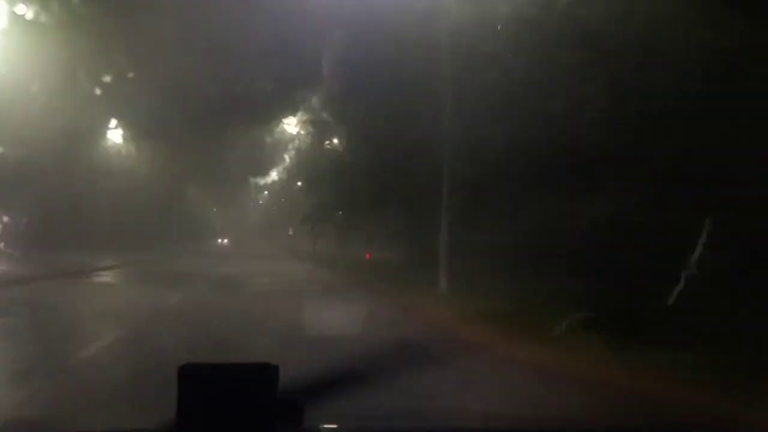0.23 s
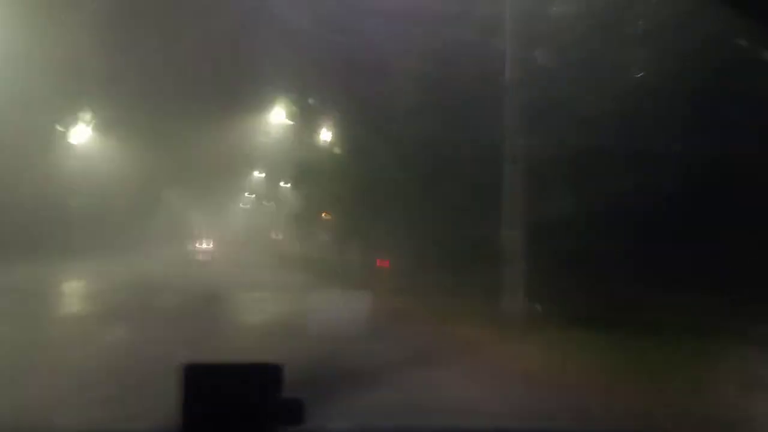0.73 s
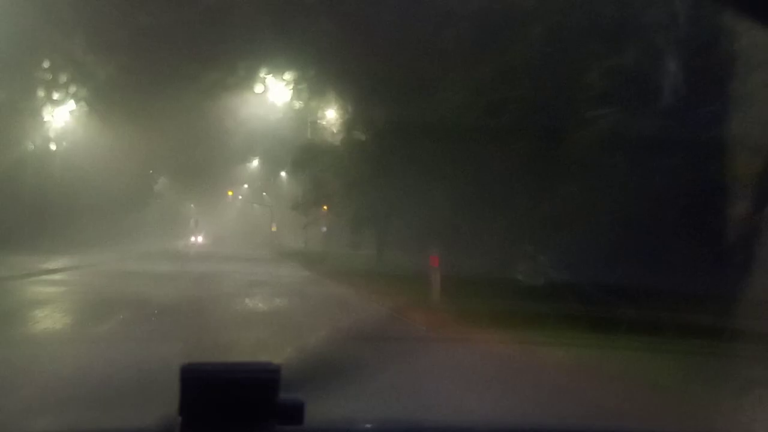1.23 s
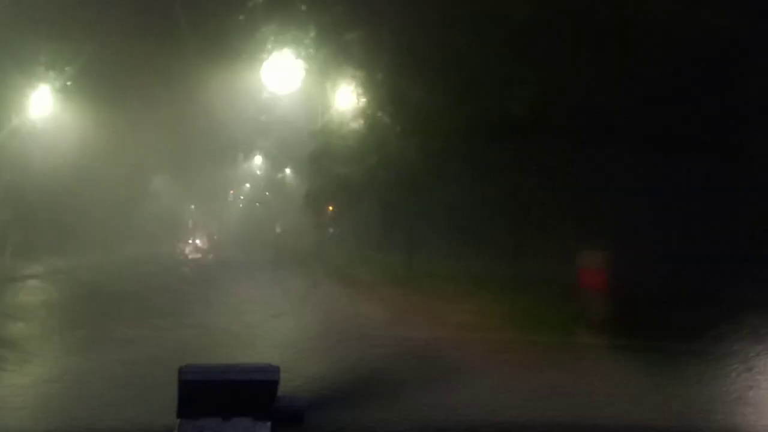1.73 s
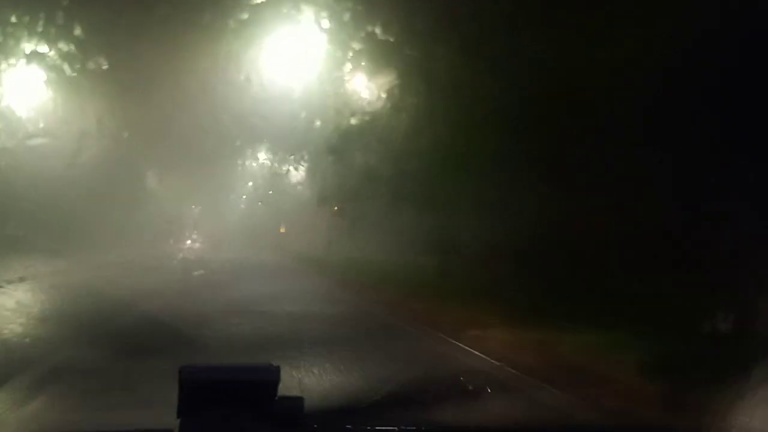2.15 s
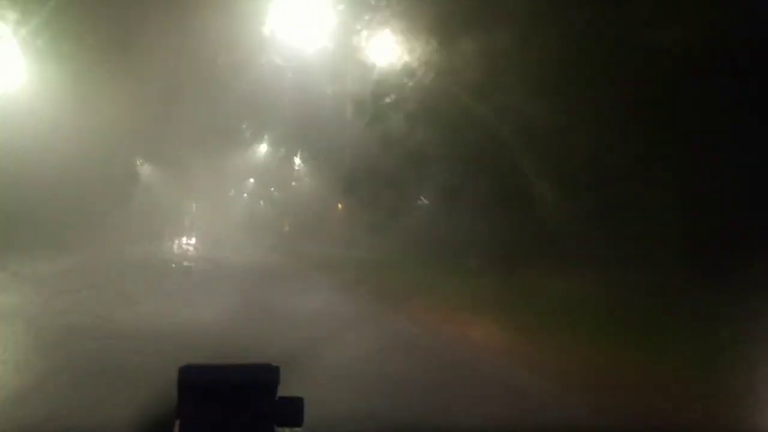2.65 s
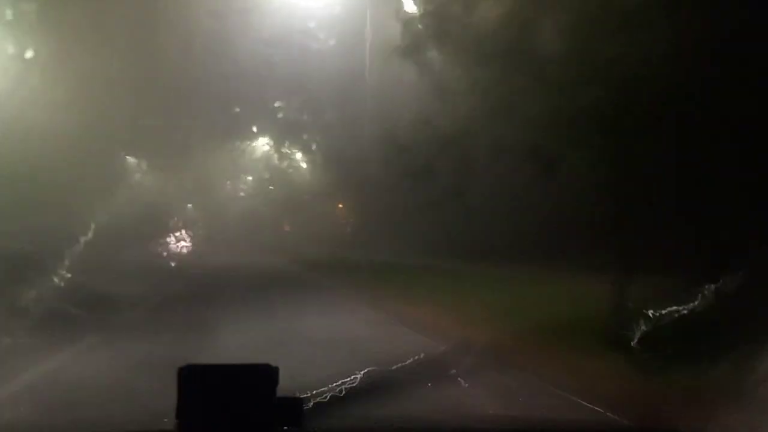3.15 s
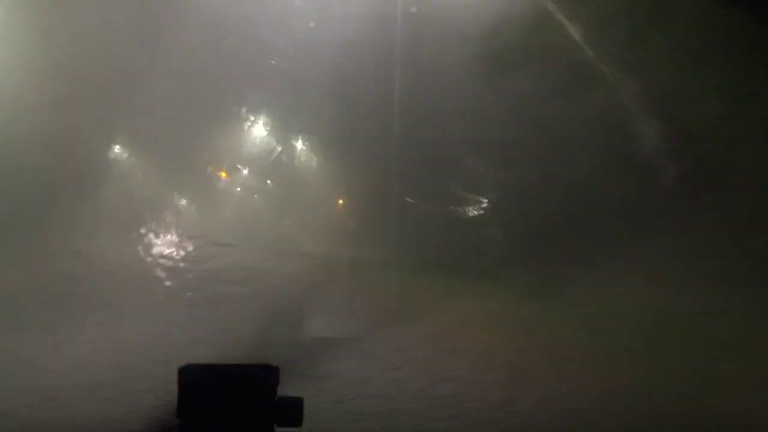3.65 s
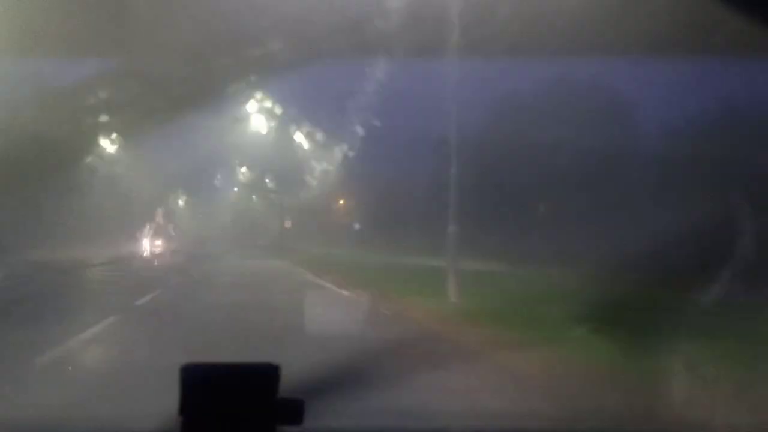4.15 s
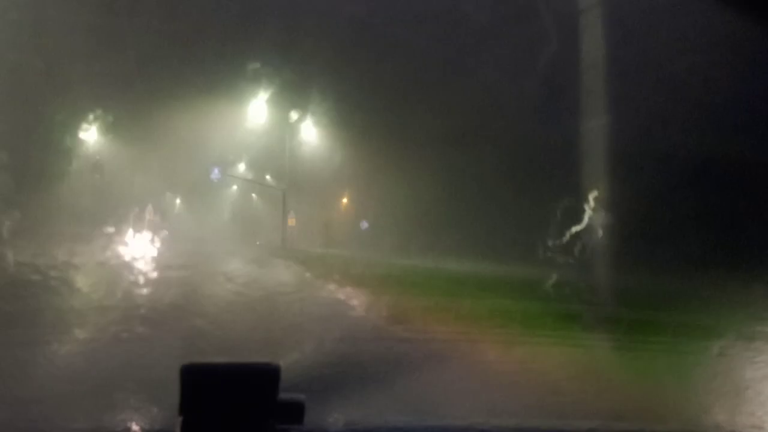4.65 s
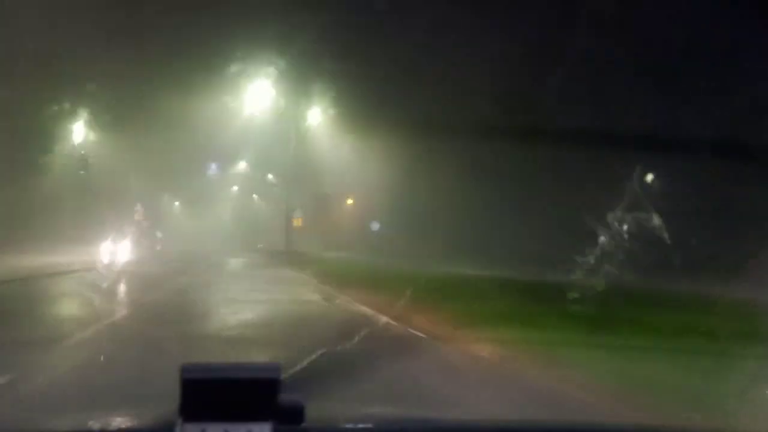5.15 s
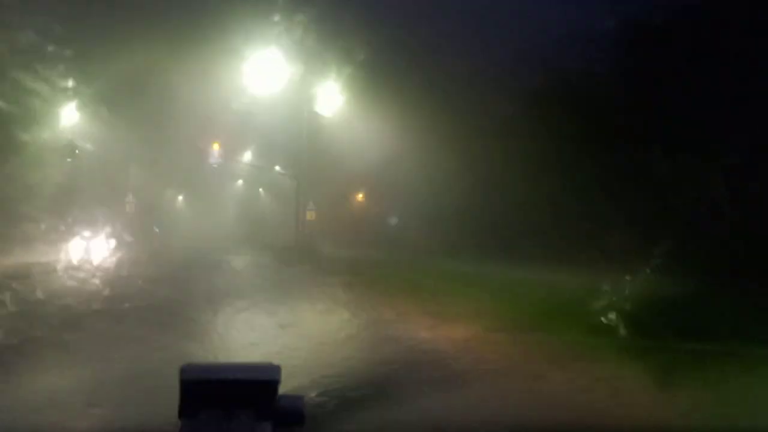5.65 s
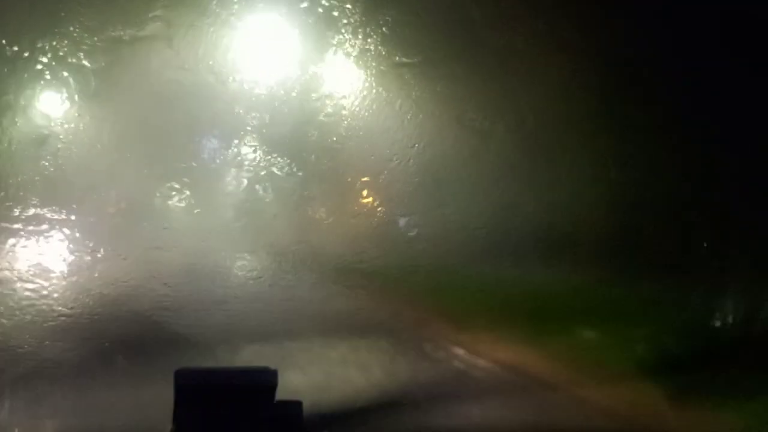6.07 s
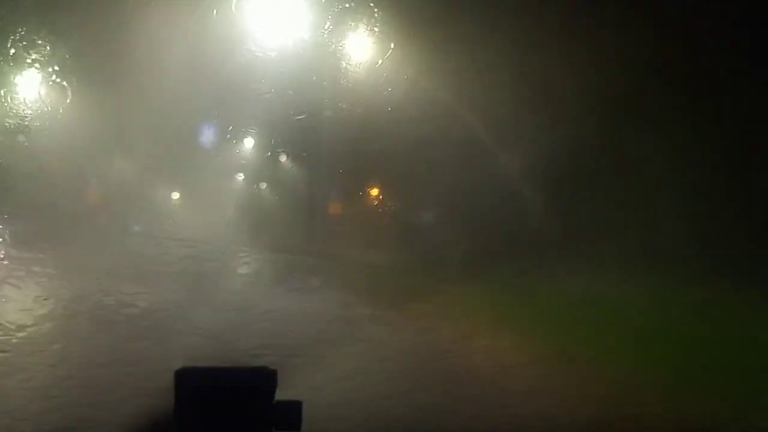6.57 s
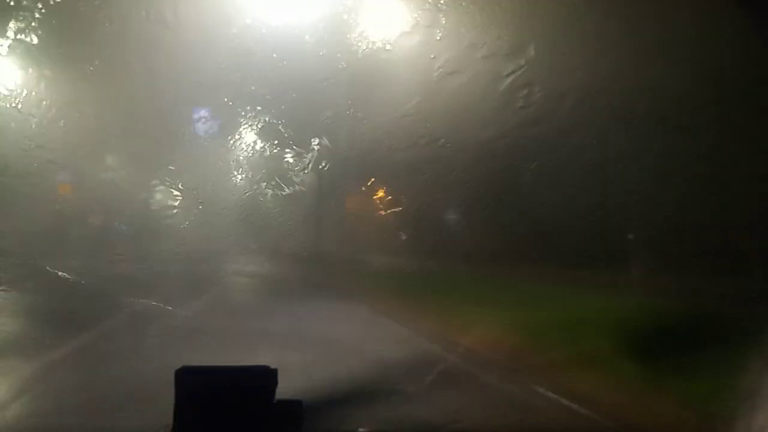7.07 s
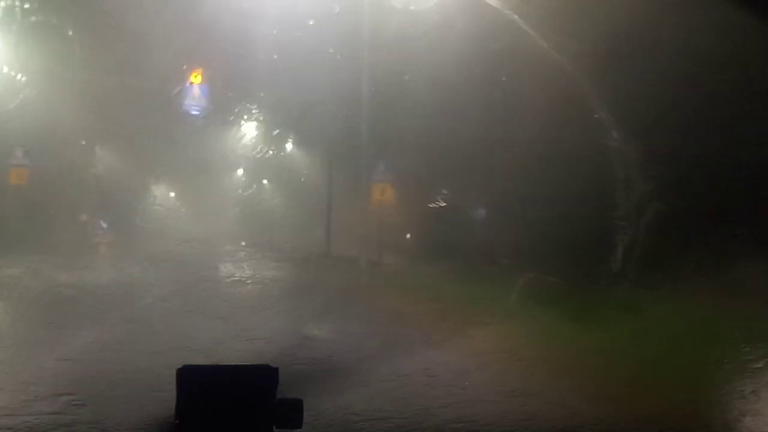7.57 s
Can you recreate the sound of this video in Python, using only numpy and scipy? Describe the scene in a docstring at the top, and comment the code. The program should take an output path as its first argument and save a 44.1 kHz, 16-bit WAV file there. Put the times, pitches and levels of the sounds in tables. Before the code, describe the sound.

Heard from one microphone inside a car in heavy rain at night. Low cabin boom and tyre rumble continue throughout, far back, under fine pattering rain and faint ticks. From 0.5 to 0.95 s a cluster of deep bumps thuds, with a tiny rising creak at 0.65; spray swells at 0.9-1.1. Moderate water drums on panels around 1.7-1.8 with dull knocks, then it thins near 2 s, with little splats until 2.6. Hissing sheets build from 2.7 to a burst at 2.9, with a hard drop tick at 2.95. After a brief dip, the loudest washes overlap from 3.35 to 4.1, another clear tick at 3.87, fading by 4.3. A small splash comes at 4.55, then quiet patter and soft low thuds at 5.1-5.3. Splashes return at 5.5-5.9, a strong sudden swash hits at 6.36, then weaker spray trails off over road rumble to 7.8.

```python
"""Inside a car driving slowly through heavy rain at night, as a single microphone hears it.
Far off in the mix, shaped noise makes road boom and rumble; decaying sines make the dull thuds of bumps
and of the wipers turning, and a short creak of the body. Close by, random droplets patter and big drops tick.
Sheets of water from puddles and wiper strokes lead: shaped droplets hiss on the glass, drum on ringing panels
and wash in the wheel wells, while narrow noise bands make jets of water ring."""
import sys
import numpy as np
from scipy import signal
from scipy.io import wavfile
from scipy.ndimage import uniform_filter1d

SR = 44100
rng = np.random.default_rng(int(sys.argv[2]) if len(sys.argv) > 2 else 0)


def ratio_of_db(decibels):
    """Turn decibels (scalar or array-like) into linear amplitude factors; 0 dB maps to 1."""
    return 10 ** (np.asarray(decibels, float) / 20)


def generate_wav(sig):
    """Save sig (samples, or channels by samples) to the path in sys.argv[1] as 16-bit PCM at SR."""
    pcm = np.round(np.clip(np.atleast_2d(sig).T, -1, 1) * 32767).astype(np.int16)
    wavfile.write(sys.argv[1], SR, pcm)


N = 343980  # samples
SWELL_STEP = 64  # samples between the points of a swell


def evened(x):
    """Scaled to rms 1."""
    return x / np.sqrt(np.mean(x ** 2) + 1e-20)


def read(points, hz):
    """Spectrum in dB at each frequency, interpolated over log frequency."""
    f, value = np.transpose(points)
    return np.interp(np.log(hz + 1), np.log(f + 1), value, left=-100, right=-100)


def curves(rows):
    """Each column after the first as a curve over time."""
    s, *columns = np.transpose(rows)
    return [np.interp(np.arange(N) / SR, s, c) for c in columns]


def impulse(points, size=4096):
    """Causal, minimum-phase impulse response with the given spectrum."""
    hz = abs(np.fft.fftfreq(size, 1 / SR))
    log_gain = np.log(ratio_of_db(read(points, hz)))
    phase = -signal.hilbert(log_gain).imag
    return np.fft.ifft(np.exp(log_gain + 1j * phase)).real[:size // 2]


def smooth_noise(shape, bins, frames):
    """Random pattern of rms 1 over pitch and time, smoothed along both."""
    pattern = rng.standard_normal(shape[::-1]).T
    pattern = uniform_filter1d(pattern, size=bins, axis=0)
    return evened(uniform_filter1d(pattern, size=frames, axis=1))


def droplets(per_s, spread_db, smooth):
    """Random impacts of uneven size over a smooth share of unresolved ones."""
    size = ratio_of_db(spread_db * np.minimum(rng.exponential(1, N), 4))
    hits = size * (rng.random(N) < per_s / SR) * rng.choice([-1., 1.], N)
    return evened(hits) + smooth * rng.standard_normal(N)


def patchy(x, patch_db, flicker_db):
    """Water lands unevenly: spots in time and pitch, and wide-band flicker."""
    z = signal.stft(x, nperseg=256, noverlap=192)[2]
    spots = smooth_noise(z.shape, bins=4, frames=16)
    flicker = evened(uniform_filter1d(rng.standard_normal(z.shape[1]), size=8))
    z = z * ratio_of_db(patch_db * spots + flicker_db * flicker)
    return evened(signal.istft(z, nperseg=256, noverlap=192)[1][:N])


def ringing(x, rings_per_s, lift, t60, bins, bands_db):
    """Each slap of water sets one small patch of glass or metal ringing briefly at its own pitch."""
    hop = 256
    hz, _, z = signal.stft(x, SR, nperseg=1024, noverlap=1024 - hop)
    chance, size = rng.random((z.shape[1], len(hz), 2)).T
    struck = chance < rings_per_s * hop / SR / len(hz)
    slaps = struck * np.minimum(-np.log(size + 1e-9), 2.2)
    slaps = uniform_filter1d(slaps, size=3, axis=1) * 3
    fade = ratio_of_db(-60 * hop / SR / t60)
    rings = signal.lfilter([1], [1, -fade], slaps, axis=1)
    rings = uniform_filter1d(rings, size=bins, axis=0) * bins
    # the set of modes in play drifts as the wet spot moves
    bands = smooth_noise(z.shape, bins, frames=18)
    z = z * (1 + lift * rings) * ratio_of_db(bands_db * bands)
    return evened(signal.istft(z, nperseg=1024, noverlap=1024 - hop)[1][:N])


def swell(s, db, rise_s, fall_s):
    """Power of one swell: straight in dB up to a rounded peak and down again."""
    round_s = 0.0032  # rounds the top
    t = np.arange(0, N + SWELL_STEP, SWELL_STEP) / SR - s
    away = np.sqrt(t ** 2 + round_s ** 2) - round_s
    span_s = np.where(t < 0, max(rise_s, .02), max(fall_s, .02))  # time for 20 dB
    return ratio_of_db(db - 20 * away / span_s) ** 2


def total(base_db, swells):
    """Gain curve of a base level with swells on top, added as powers."""
    coarse = np.arange(0, N + SWELL_STEP, SWELL_STEP)
    power = np.interp(np.arange(N), coarse, sum(swells))
    return np.sqrt(ratio_of_db(base_db) ** 2 + power)


# Road roughness under the cabin: time_s, boom_db, rumble_db
ROAD_LEVELS = [(0, -54.5, -58.5), (.43, -52, -58.5), (1.0, -53.5, -53.5), (1.3, -57.5, -58),
               (2.1, -54, -56), (2.6, -57.5, -58), (3.1, -64, -60.5), (3.9, -58, -58), (4.65, -54.5, -58),
               (5.1, -53, -58.5), (5.9, -59.5, -58.5), (6.6, -57, -59), (7.3, -52, -57), (7.8, -52.5, -56)]
# Rough spots in the road: peak_s, boom_db, rumble_db, fall_s (over 20 dB)
ROUGH_SPOTS = [(.45, -49, -64, .12), (0.559, -32.5, -57, 0.059), (.67, -42, -58, 0.053),
               (0.781, -43, -66, 0.35), (1.1, -64, -46.5, 0.08), (1.21, -47.5, -71, 0.052),
               (1.7, -44.5, -48.5, 0.25), (1.842, -37.5, -63, 0.023), (2.3, -51, -68, 0.2),
               (2.52, -48.5, -68, 0.067), (2.76, -44, -63, 0.04), (2.87, -48, -55.5, 0.31),
               (3.001, -43, -49, 0.03), (3.17, -47, -66, 0.2), (3.25, -48, -64, 0.084),
               (3.45, -47, -78, 0.44), (3.82, -56, -70, 0.36), (4.78, -48, -67, 0.26),
               (5.26, -49, -57, 0.13), (5.6, -51, -62, 0.26), (5.93, -55, -76, 0.54),
               (6.34, -49, -56, 0.16), (6.54, -46, -69, 0.06), (7.28, -50, -63, 0.067),
               (7.43, -51.5, -70, 0.24)]
# Spectrum of the cabin boom: pitch_hz, relative level_db (per Hz)
BOOM_SPECTRUM = [(13, -65), (22, -16), (48, -2.5), (70, 4), (119, 9), (136, 7), (170, -8), (220, -14.5),
                 (370, -120)]
# Spectrum of the higher tyre rumble: pitch_hz, relative level_db (per Hz)
RUMBLE_SPECTRUM = [(94, -59), (160, -5.5), (194, 1.5), (352, -6), (409, -11), (463, -10.5), (900, -23.5),
                   (1170, -48), (1980, -120)]


def road():
    """Tyre vibration excites the cabin boom and a higher rumble, lumpy and swelling at rough spots."""
    rise_share = 0.4  # rise time against fall time
    boom_db, rumble_db = curves(ROAD_LEVELS)
    boom, rumble = (evened(signal.oaconvolve(rng.standard_normal(N), impulse(s, size=32768))[:N])
                    for s in (BOOM_SPECTRUM, RUMBLE_SPECTRUM))
    slow = uniform_filter1d(rng.standard_normal(N), size=2600)
    lumps = ratio_of_db(1.5 * evened(uniform_filter1d(slow, size=2600)))  # 1.5 dB rms
    boom_gain = total(boom_db, [swell(s, db, rise_share * f, f) for s, db, _, f in ROUGH_SPOTS])
    rumble_gain = total(rumble_db, [swell(s, db, rise_share * f, f) for s, _, db, f in ROUGH_SPOTS])
    return lumps * (boom_gain * boom + rumble_gain * rumble)


# One rising creak of the body: start_s, length_s, from_hz, to_hz, level_db
CREAK = (.642, .064, 240, 290, -41)


def groan():
    """A short tone that climbs as the body twists back, swelling late and then dying away."""
    s, length, from_hz, to_hz, db = CREAK
    u = np.clip((np.arange(N) / SR - s) / length, 0, 1)
    cycles = np.cumsum(from_hz + (to_hz - from_hz) * u) / SR
    return ratio_of_db(db) * np.sin(np.pi * u ** 2) * np.sin(2 * np.pi * cycles)


# Jolts of the body: start_s, level_db (before the soft onset), pitch_hz, t60_s
JOLTS = [(0.508, -21, 101.3, 0.28), (0.549, -29, 58.4, 0.39), (0.561, -28, 105, 0.097),
         (0.545, -30.5, 187, 0.14), (0.71, -29.5, 60.3, 0.41), (0.771, -20.5, 63, 0.13),
         (0.818, -24.5, 64, 0.19), (0.879, -31, 64, 0.16), (0.949, -35, 52, 0.31), (1.689, -41, 125, 0.28),
         (2.073, -41, 57.7, 0.25), (1.697, -34, 240, 0.1), (1.75, -31, 230, .1), (1.778, -31.5, 213, 0.11),
         (1.835, -39.5, 170, 0.09), (2.288, -35.5, 230, 0.1), (2.735, -38.5, 125, 0.13),
         (2.846, -38.5, 123.4, 0.56), (3.09, -33, 73.6, 0.12), (3.782, -34, 123, 0.25),
         (5.122, -34, 100, 0.17), (5.135, -26, 52.3, 0.28), (5.226, -25.5, 53, 0.22),
         (5.241, -28, 104, 0.14), (5.311, -33, 95, 0.13), (6.969, -42, 416, 0.14)]


def thuds():
    """Each jolt swings the body for a few cycles."""
    out, t = np.zeros(N + SR), np.arange(SR // 2) / SR
    for s, db, hz, t60 in JOLTS:
        envelope = ratio_of_db(db - 60 * t / t60) * (1 - np.exp(-t / 0.004))
        out[round(s * SR):][:len(t)] += envelope * np.sin(2 * np.pi * hz * t)
    return out[:N]


# Background spray level under the surges, rising and falling: time_s, hiss_db
SPRAY_LEVELS = [(0, -53), (.06, -51), (.24, -52.5), (.37, -61), (.54, -71), (.63, -57.5), (.8, -59),
                (1.26, -59.5), (1.97, -75), (2.17, -65), (2.32, -63), (2.45, -72), (3.04, -70.5),
                (3.15, -54), (3.3, -58), (4.26, -49.5), (4.39, -51), (4.67, -58.5), (5.13, -65),
                (5.19, -66), (5.41, -65), (6.17, -59.5), (6.67, -64), (7.1, -60), (7.52, -55.5), (7.8, -63)]
# Sheets of water thrown at the car: peak_s, hiss_db, rise_s, fall_s (each over 20 dB, of the hiss),
# panel_db (drumming above the hiss), well_db (wheel-well wash above the hiss)
WATER_SHEETS = [(0.476, -50, 0.12, 0.12, -14, -14), (.895, -40.5, 0.062, 0.14, -5.5, -25),
                (.94, -43, 0.11, 0.075, -18, -17), (1.085, -42, 0.11, 0.17, -10, -20),
                (1.34, -50, 0.093, 0.39, -16, -13), (1.46, -52, 0.2, 0.52, -5.5, -9),
                (1.697, -41, 0.073, 0.3, -5.5, -15), (1.768, -44.5, 0.14, 0.14, -3.5, -9),
                (1.86, -56, 0.14, 0.073, 0, 2.5), (2.14, -56, 0.22, 0.055, -9, -17),
                (2.492, -50.5, 0.021, 0.19, -3.5, -17), (2.558, -51, 0.066, 0.081, -25, -13),
                (2.71, -36, 0.083, 0.098, -6, -6.5), (2.851, -33, 0.3, 0.066, -6, -13),
                (2.912, -30, 0.14, 0.054, -7.5, -16), (2.955, -38, .1, 0.041, -7.5, -8),
                (3.358, -31, 0.023, 0.22, -10.5, -18), (3.4, -37.5, 0.072, 0.092, -9, -11),
                (3.55, -31, 0.14, 0.36, -10, -38), (3.63, -30, 0.25, 0.19, -17.5, -8),
                (3.709, -34, 0.15, 0.14, -5, -6), (3.919, -28, 0.1, 0.16, -7, -9),
                (4.018, -35, 0.02, 0.2, -3.5, -11.5), (4.068, -35.5, 0.059, 0.078, -15, -7.5),
                (4.119, -42, 0.096, 0.15, -3, 0), (4.189, -55, 0.067, 0.26, -5, -11),
                (4.55, -45, 0.086, 0.13, -11.5, -9), (5.51, -42.5, 0.12, .2, -7, -10.5),
                (5.59, -52, 0.13, 0.19, -0.5, -9), (5.781, -41, 0.15, 0.15, -4, -10.5),
                (5.88, -39.5, 0.21, 0.18, -9, -15), (5.995, -44.5, 0.082, 0.048, -29, -31),
                (6.08, -52, 0.12, 0.16, -12, -5), (6.359, -31, 0.077, 0.17, -12.5, -14.5),
                (6.418, -37, 0.19, 0.12, -3, -3.5), (6.52, -41, 0.27, 0.16, -9, -27),
                (6.58, -50.5, 0.24, 0.087, -6, -19), (6.78, -51, 0.29, .3, -7.5, -9.5),
                (6.97, -53, 0.086, 0.21, -7, -3)]


def flows():
    """Gains of hiss, panel drumming and wheel-well wash: heavy water lands after the fine spray."""
    lag_s, linger = 0.024, 0.84  # delay of heavy water; its fall time against that of the spray
    base_db = curves(SPRAY_LEVELS)[0]
    heavy_base_db = base_db - 9
    hiss = total(base_db, [swell(*row[:4]) for row in WATER_SHEETS])
    panel = total(heavy_base_db, [swell(s + lag_s, db + p, r, linger * f) for s, db, r, f, p, _ in WATER_SHEETS])
    well = total(heavy_base_db, [swell(s + lag_s, db + w, r, linger * f) for s, db, r, f, _, w in WATER_SHEETS])
    return hiss, panel, well


# Spectrum of the even patter: pitch_hz, relative level_db (per Hz)
PATTER_SPECTRUM = [(600, -23), (900, -5), (2000, -6.5), (3400, 0), (5900, -3), (6700, -8), (8200, -26.5),
                   (13500, -40.5), (15300, -22), (16200, -47)]
PATTER_MOST_DB = -59.5  # highest level of the patter


def rain():
    """Even patter of countless small drops: it takes the place of the hiss while little water is thrown."""
    level = np.minimum(flows()[0], ratio_of_db(PATTER_MOST_DB))
    drops = droplets(6000, 4.5, smooth=0.72)
    return level * evened(signal.oaconvolve(drops, impulse(PATTER_SPECTRUM))[:N])


# Big drops on the windscreen, close by: start_s, peak_db
BIG_DROPS = [(0.127, -43), (1.533, -42), (1.827, -47), (2.952, -14.5), (3.8707, -24.5), (4.705, -42),
             (2.082, -52)]
# Spectrum of one tick: pitch_hz, relative level_db
TICK_SPECTRUM = [(500, -7), (2500, -30), (5500, 12), (6800, 4), (8500, -17), (11000, -11.5), (13500, -26),
                 (15500, -3), (16500, -25)]


def ticks():
    """A sharp tap and a millisecond of splatter; faint ones fall at random."""
    faint_db = -66 + 3.5 * np.minimum(rng.exponential(1, N), 3)
    train = ratio_of_db(faint_db) * (rng.random(N) < 18 / SR)  # 18 a second
    for s, db in BIG_DROPS:
        train[round(s * SR)] = ratio_of_db(db)
    t = np.arange(200) / SR
    splatter = (t == 0) + 0.14 * np.exp(-t / 0.0011) * rng.standard_normal(len(t))
    tick = signal.convolve(impulse(TICK_SPECTRUM, size=512), splatter)
    return -signal.oaconvolve(train, tick / abs(tick).max())[:N]


# Jets of water on one patch of glass or panel: middle_s, pitch_hz, level_db (before the fades),
# half_length_s (from silence to the middle)
WATER_JETS = [(0.86, 4000, -53, 0.037), (.9, 3710, -53, 0.057), (1.077, 3560, -47, 0.085),
              (1.11, 500, -50, 0.049), (1.75, 580, -48, 0.043), (1.83, 823, -54, 0.077),
              (1.885, 1710, -56.5, 0.045), (1.889, 780, -54, 0.045), (2.5, 5170, -53.5, 0.027),
              (2.565, 3250, -49.5, .04), (2.715, 3450, -43, 0.031), (3.63, 565, -43, 0.052),
              (3.953, 542, -39, .07), (4.201, 627, -49, 0.08), (5.513, 3400, -57.5, 0.055),
              (5.559, 775, -52, .08), (5.775, 4600, -51.5, 0.043), (5.874, 3460, -60, .05),
              (6.361, 3630, -43, 0.078)]


def jets():
    """A jet holds one patch ringing: a narrow wavering band that swells and fades."""
    width = 0.015  # bandwidth as a share of the pitch
    out = np.zeros(N + SR)
    for s, hz, db, half in WATER_JETS:
        t = np.arange(-half, half, 1 / SR)
        r = np.exp(-np.pi * width * hz / SR)
        a, b = rng.standard_normal((2, SR // 4))
        waver = signal.lfilter([1], [1, -r], a + 1j * b)[-len(t):]
        band = evened((waver * np.exp(2j * np.pi * hz * t)).real)
        out[round((s - half) * SR):][:len(t)] += ratio_of_db(db) * band * np.cos(np.pi * t / half / 2) ** 2
    return out[:N]


# Small splats on the glass: start_s, level_db (before the onset)
GLASS_SPLATS = [(2.108, -45), (2.214, -49.5), (2.249, -51), (2.279, -57), (2.303, -48), (2.357, -47),
                (2.413, -55), (2.494, -48), (2.529, -47), (2.557, -47), (3.329, -54), (5.09, -50.5),
                (5.125, -50.5), (5.253, -52)]


def splats():
    """Gain of single handfuls of water: a fast rise and a short tail."""
    gain, t = np.zeros(N + SR), np.arange(SR // 5) / SR
    for s, db in GLASS_SPLATS:
        gain[round(s * SR):][:len(t)] += ratio_of_db(db - 60 * t / 0.063) * (1 - np.exp(-t / 0.0035))
    return gain[:N]


# Wheel-well cavity, beyond the cabin: pitch_hz, relative level_db (per Hz)
WELL_SPECTRUM = [(330, -23.5), (440, -6), (540, -2), (640, -4.5), (760, -2), (900, -14)]


def wheel_well():
    """Deep water booms in the wheel wells: droplets through the cavity's spectrum."""
    drops = droplets(1200, 0.73, smooth=1.0)
    return evened(signal.oaconvolve(drops, impulse(WELL_SPECTRUM))[:N])


# Ringing body panels around the cabin: pitch_hz, width_hz, relative level_db
PANEL_MODES = [(1140, 260, -6), (1424, 31, -4), (2054, 43, -8.5)]


def panel_drumming():
    """Heavier droplets ring the panels: a few strong modes among many weak ones."""
    blows, drum, t = droplets(1200, 1.0, smooth=0.85), 0, np.arange(4096) / SR
    for hz, width, db in PANEL_MODES:
        ring = width * ratio_of_db(db) * np.exp(-np.pi * width * t) * np.sin(2 * np.pi * hz * t)
        drum = drum + signal.oaconvolve(blows, ring)[:N]
    weak_modes = signal.sosfilt(signal.butter(2, [760, 1900], "band", fs=SR, output="sos"), blows)
    return patchy(evened(drum) + 1.06 * evened(weak_modes), 0.98, 0.74)


# Fine spray through glass and microphone: pitch_hz, relative level_db (per Hz)
HISS_SPECTRUM = [(880, -27.5), (1500, -7.5), (1890, -9), (2050, -7.5), (3380, 3), (5870, 0), (6620, -7.5),
                 (8600, -37), (13500, -46), (15500, -29), (16000, -57), (16500, -62)]
# Fine treble in the hiss, before its flicker: time_s, gain_db (above 7.5 kHz)
TREBLE_GAIN = [(0, 3), (2, 2.5), (2.4, -21), (2.85, 6), (3, 16), (3.3, 8.5), (4.5, 8.5), (5, -8),
               (5.7, -0.5), (6.4, -2), (7, 9.5), (7.8, -2)]


def fine_hiss():
    """Fine droplets hiss on the glass, in patches and short rings, with a flickering treble."""
    hiss = signal.oaconvolve(droplets(4000, 2.4, smooth=1.0), impulse(HISS_SPECTRUM))[:N]
    hiss = ringing(patchy(hiss, 1.8, 1.1), 2500, .15, t60=.1, bins=3, bands_db=3.7)
    flicker_db = 2.2 * evened(uniform_filter1d(rng.standard_normal(N), size=1000))
    treble = signal.sosfiltfilt(signal.butter(4, 7500, "high", fs=SR, output="sos"), hiss)
    return hiss + (ratio_of_db(curves(TREBLE_GAIN)[0] + flicker_db) - 1) * treble


def water():
    """Thrown water: fine droplets hiss, heavier ones drum on panels and wash in the wheel wells."""
    flow, panel_gain, well_gain = flows()
    hiss = fine_hiss()
    low = panel_gain / flow * panel_drumming() + well_gain / flow * wheel_well()
    low_rms = np.sqrt(np.mean(low ** 2))
    low = low_rms * ringing(low, 3000, .2, t60=.08, bins=3, bands_db=2.9)
    # what rises above the even patter
    spray = np.sqrt(np.maximum(flow ** 2 - ratio_of_db(PATTER_MOST_DB) ** 2, 0))
    splat = splats()
    return (spray + splat) * hiss + (flow + 1.1 * splat) * low


def scene():
    """Everything heard in the cabin, on one channel."""
    mix = road() + groan() + thuds() + rain() + ticks() + jets() + water()
    return mix[None]


def top_cut(x):
    """Nothing passes above the cut-off."""
    return signal.sosfilt(signal.butter(12, 17160, fs=SR, output="sos"), x)


def record(dry):
    """The finished mix as it is kept."""
    return top_cut(dry)


dry = scene()
out = record(dry)
generate_wav(out)
```